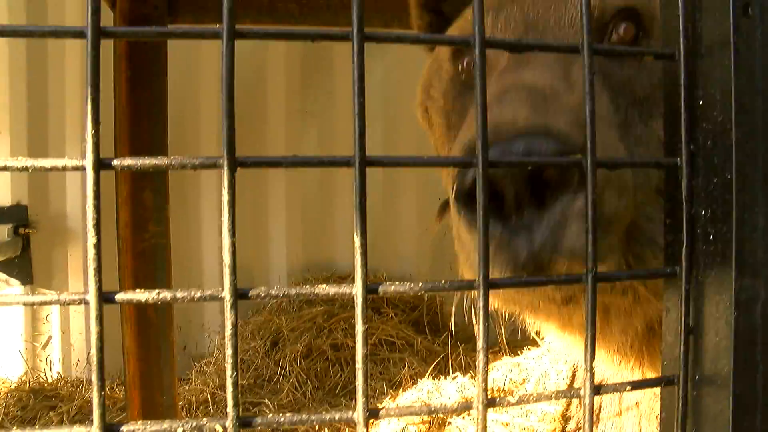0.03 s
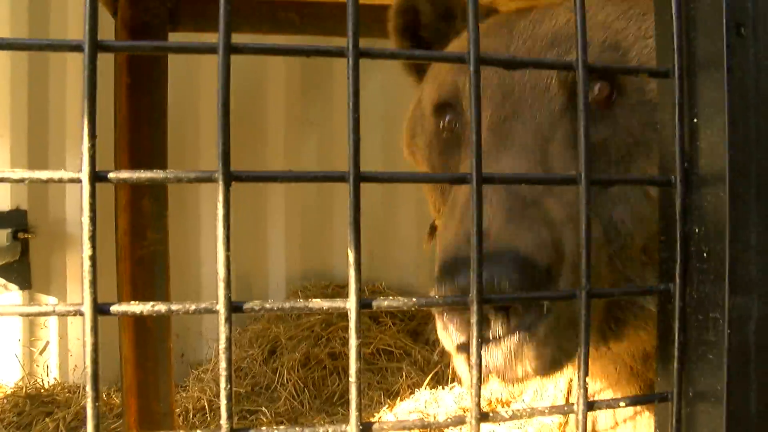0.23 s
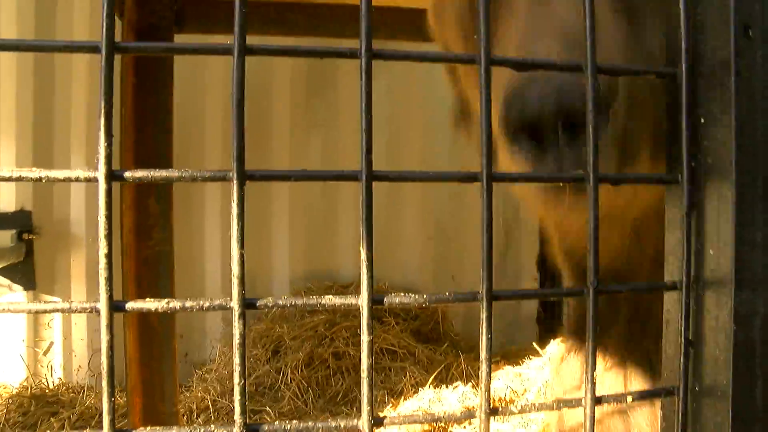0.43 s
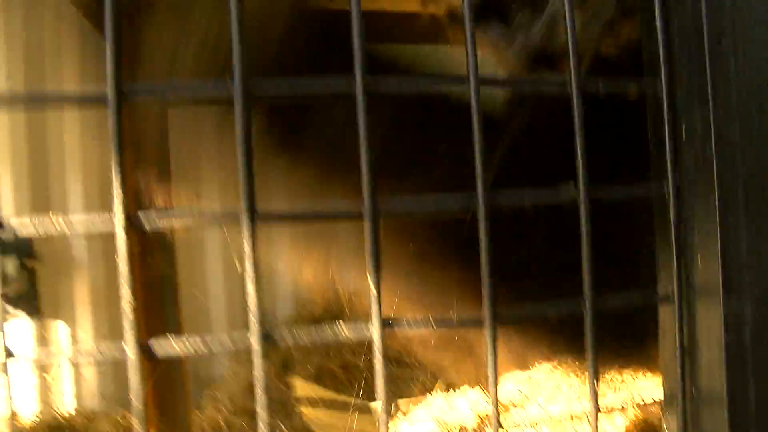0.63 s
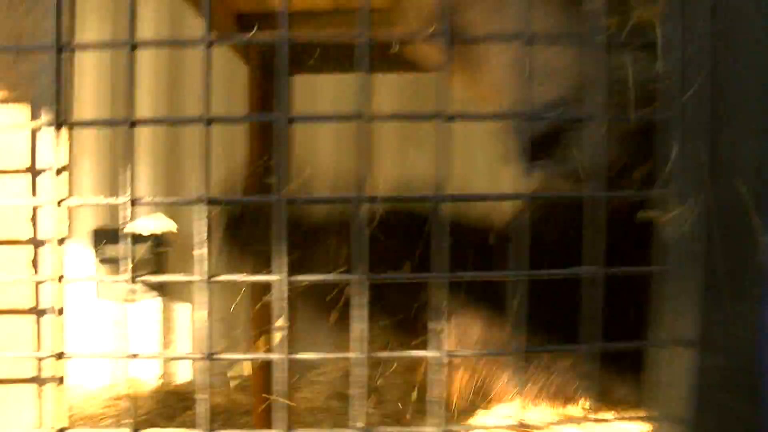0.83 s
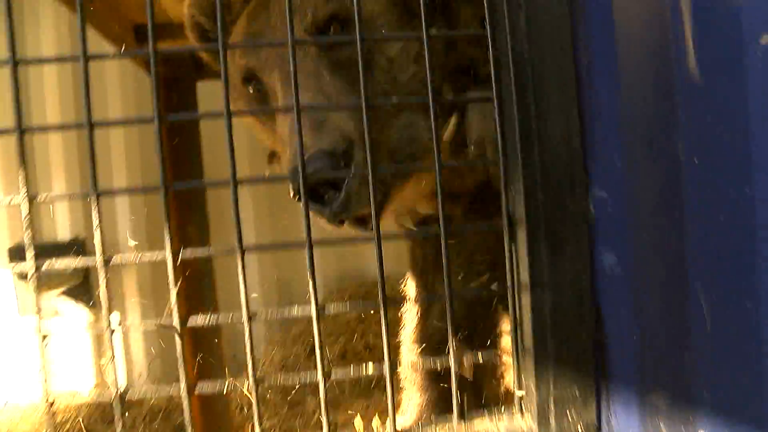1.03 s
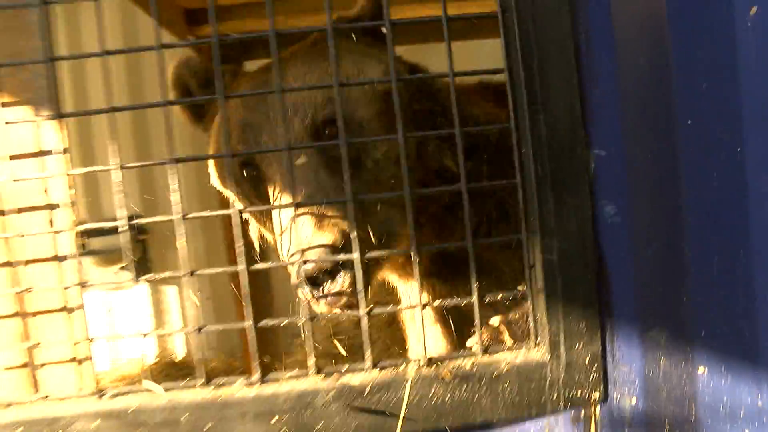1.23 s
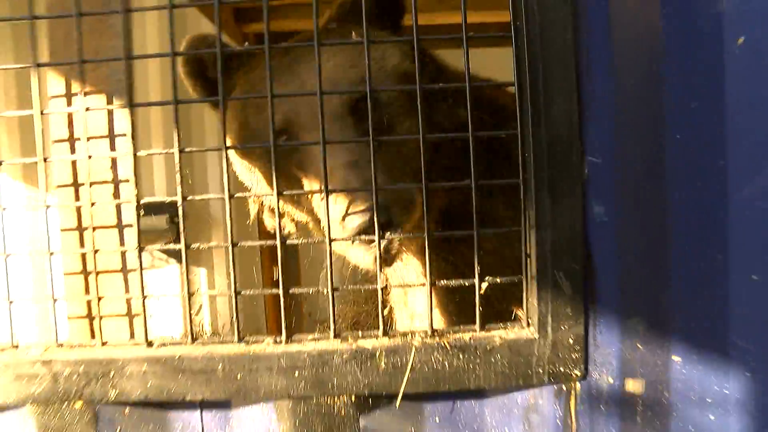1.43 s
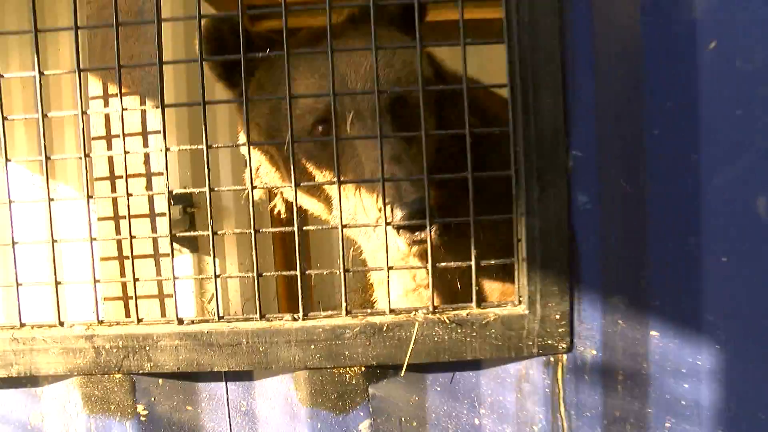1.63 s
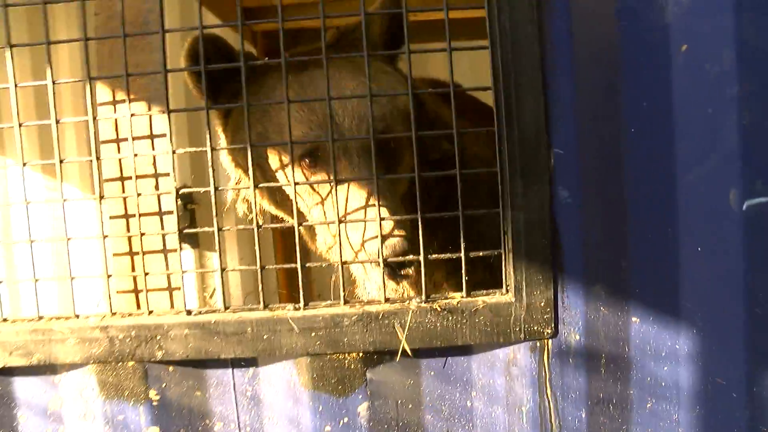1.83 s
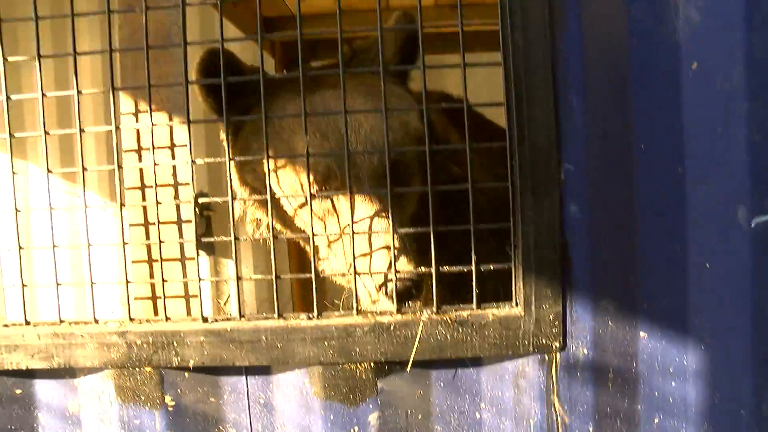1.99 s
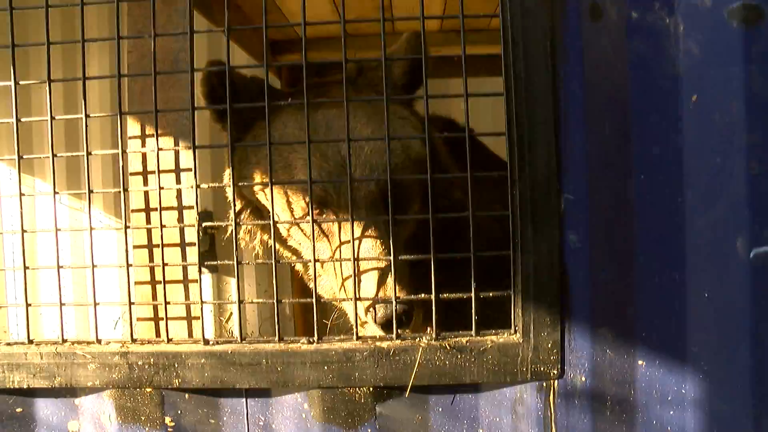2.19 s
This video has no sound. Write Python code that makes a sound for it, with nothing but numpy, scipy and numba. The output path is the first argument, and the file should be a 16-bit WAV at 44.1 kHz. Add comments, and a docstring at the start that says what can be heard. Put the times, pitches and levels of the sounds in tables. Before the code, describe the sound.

A bear huffs close by in a steel cage. A hiss starts at about 0.1 seconds and opens into two loud, hoarse, roaring surges from 0.4 to 0.8. Air rumbles as it lunges, with a hollow floor thump at 1.0, then lighter knocks, rattling wire mesh and faint crackling straw until 1.6. A weaker, breathy huff follows from 1.7 and fades by 2.3 seconds.

```python
"""Bear huffing in a steel cage.

A long double huff: a hiss opens into a roaring blast over a fluttering throat. The bear lunges:
air rumbles, the hollow floor knocks, the mesh rattles, straw crackles. A weaker huff follows.
Heard from just outside the bars, through a limiter."""
import sys
import numpy as np
from scipy import signal
from scipy.fft import rfft, irfft
from scipy.io import wavfile
from scipy.ndimage import uniform_filter1d, minimum_filter1d
from numba import njit

SR = 44100
rng = np.random.default_rng(int(sys.argv[2]) if len(sys.argv) > 2 else 0)


def wav_record(signal):
    """Record a signal, one row per channel, as 16-bit PCM in the file named by sys.argv[1]."""
    frames = np.transpose(np.atleast_2d(signal))
    bounded = np.clip(frames, -1, 1)
    # unit amplitude maps onto the largest positive 16-bit level
    quanta = np.round(bounded * 32767).astype(np.int16)
    wavfile.write(sys.argv[1], SR, quanta)


N = 103635

# hollow floor modes: freq_hz, gain_db, t60_s
FLOOR_MODES = [(210, -9, 0.11), (243.2, 7.5, 0.09), (290, 2, 0.06), (318, -10.5, 0.063), (346, -9, 0.117)]
# spectrum of straw and wire cracks: freq_hz, gain_db
CRACKLE_SPECTRUM = [(300, -32), (1000, 2.5), (2500, -7), (3500, -6), (6300, -16.5), (8000, -17.5),
                    (15000, -29)]


def undb(db):
    """Decibels to gain."""
    return 10 ** (np.asarray(db) / 20)


def unit(x):
    """Scale to rms 1."""
    return x / np.sqrt(np.mean(x ** 2))


def noise():
    """White noise."""
    return rng.standard_normal(N)


def waver(rate_hz):
    """Smooth random drift, rms 1."""
    span = int(SR / rate_hz)
    return unit(uniform_filter1d(uniform_filter1d(noise(), span), span))


def curve(rows, column=1):
    """Table column, interpolated in time."""
    rows = np.array(rows)
    return np.interp(np.arange(N) / SR, rows[:, 0], rows[:, column])


def swell(rows, column=1):
    """Gain from a dB column, fading beyond its ends."""
    t = np.arange(N) / SR
    outside_s = np.maximum(rows[0][0] - t, 0) + np.maximum(t - rows[-1][0], 0)
    return undb(curve(rows, column)) * np.exp(-outside_s / .018)


def colour(x, spectrum):
    """Shape by (freq_hz, gain_db) points, steep cut below the first; rms 1."""
    hz, db = np.array(spectrum).T
    bins_hz = np.maximum(np.arange(N + 1) * SR / (2 * N), 1)
    gain = undb(np.interp(np.log(bins_hz), np.log(hz), db))
    low_cut = np.minimum(bins_hz / hz[0], 1) ** 3
    return unit(irfft(rfft(x, 2 * N) * gain * low_cut)[:N])


@njit
def svf(x, hz, width_hz):
    """State-variable filter: band-pass and low-pass outputs."""
    y = np.empty((2, len(x)))
    band_state, low_state = 0., 0.
    for i in range(len(x)):
        g, damping = np.tan(np.pi * hz[i] / SR), width_hz[i] / hz[i]
        band = (band_state + g * (x[i] - low_state)) / (1 + g * (g + damping))
        y[0, i], y[1, i] = damping * band, low_state + g * band
        band_state = 2 * band - band_state
        low_state += 2 * g * band
    return y


def resonate(x, hz, width_hz):
    """Band-pass with a constant or moving centre."""
    return svf(x, hz * np.ones(N), width_hz * np.ones(N))[0]


@njit
def follow(x, keep):
    """Peak follower."""
    y, peak = np.empty(len(x)), 0.
    for i in range(len(x)):
        peak = max(abs(x[i]), peak * keep)
        y[i] = peak
    return y


def steady(x, span_s=.0425):
    """Even out slow level swings."""
    return x / np.sqrt(uniform_filter1d(x ** 2, int(span_s * SR)) + 1e-12)


def strikes(rows):
    """Impulses from (start_s, level_db) rows."""
    out = np.zeros(N)
    for start_s, db in rows:
        out[int(start_s * SR)] += undb(db)
    return out


def grains(rate_hz, spread_db):
    """Random tiny impacts of uneven size."""
    hits = (rng.random(N) < rate_hz / SR) * np.sign(noise())
    return hits * undb(spread_db * np.clip(noise(), -2, 2))


def ring(modes, scatter_db=0):
    """Struck body, peak 1; scatter randomises the mode weights."""
    t = np.arange(SR // 3) / SR
    out = np.zeros(len(t))
    for hz, db, t60_s in modes:
        weight = undb(db + scatter_db * rng.standard_normal())
        out += weight * np.sin(2 * np.pi * hz * t) * np.exp(-np.log(1000) * t / t60_s)
    return out / np.abs(out).max()


def play(x, response):
    """Convolve with a response."""
    return signal.fftconvolve(x, response)[:N]


def burst(start_s, db, sound, decay_s):
    """Sudden onset, exponential decay."""
    t = np.arange(SR // 20) / SR
    return play(strikes([(start_s, db)]), unit(sound)[:len(t)] * np.exp(-t / decay_s) / 2)


def outdoor_air():
    """Faint steady background."""
    # ambient noise: freq_hz, gain_db
    spectrum = [(25, 3.5), (70, -9.5), (150, -2.5), (270, -27), (350, -8.5), (700, -19.5), (1100, -26),
                (2000, -27), (15000, -44.5)]
    return undb(-55.5) * colour(noise(), spectrum)


def walls(x, wet_db=-13, decay_s=.0059):
    """Quick reflections from close steel walls."""
    t = np.arange(SR // 6) / SR
    echoes = grains(rate_hz=630, spread_db=3.5)[:len(t)] * np.exp(-t / decay_s) * (t > .002)
    wet = play(x, echoes / np.linalg.norm(echoes))
    return (x + undb(wet_db) * wet) / np.hypot(1, undb(wet_db))


def snaps():
    """Dry stalks break with short bright ticks."""
    # breaking straws: start_s, level_db, pitch_hz
    breaks = [(.045, -49.5, 5000), (.95, -46, 10000), (.993, -35, 10000), (1.079, -38, 6500),
              (1.1283, -36, 6100), (1.44, -51, 12500), (1.556, -42, 9200)]
    return sum(burst(start_s, db, resonate(noise(), hz, width_hz=3500), decay_s=.0017)
               for start_s, db, hz in breaks)


def mesh_ring():
    """One spot on the mesh, with its own tuning and mode mix."""
    # mesh modes: freq_hz, gain_db, t60_s
    modes = [(590, 2.5, 0.11), (758, -8.5, 0.14), (1090, 0, 0.13), (1562, -6.5, .07), (2010, -0.5, 0.022),
             (2170, -6, 0.043), (3410, -5, 0.02), (4070, -8, 0.029), (4990, -4.5, .025), (6200, -5, .03)]
    detuned = [(hz * np.exp(.04 * rng.standard_normal()), db, t60_s) for hz, db, t60_s in modes]
    return ring(detuned, scatter_db=5)


def jingle(spots):
    """Small taps at several spots on the mesh."""
    return unit(sum(play(grains(rate_hz=800 / spots, spread_db=4), mesh_ring()) for _ in range(spots)))


def clacks():
    """The mesh slaps its frame and bounces once."""
    # slaps: start_s, level_db
    slaps = [(1.3922, -24), (1.3965, -28)]
    # slap noise: freq_hz, gain_db
    spectrum = [(450, 0), (1900, 2), (2600, -20), (6400, -18), (12000, -38)]
    return sum(burst(start_s, db, colour(noise(), spectrum), decay_s=.004) for start_s, db in slaps)


def rattle(start_s, db, pitch_hz, crack_s=.0025):
    """A loose wire cracks against its neighbour, rings, shakes the mesh and bounces."""
    # wire partials: freq_ratio, gain_db, t60_s
    partials = [(1, 0, .045), (1.77, -6, .035), (3.25, -16, .02)]
    t = np.arange(SR // 3) / SR
    wire = ring([(pitch_hz * ratio, gain_db, t60_s) for ratio, gain_db, t60_s in partials], scatter_db=1)
    crack = colour(noise(), CRACKLE_SPECTRUM)[:len(t)] * np.exp(-t / crack_s)
    bounce_s = rng.uniform(.003, .014)
    hits = strikes([(start_s, db), (start_s + bounce_s, db - 6)])
    return play(hits, wire + undb(-8) * mesh_ring() + undb(-10) * crack)


def knock(start_s, peak_db):
    """A padded paw drives one low band of the floor: a boom, no click."""
    floor = play(strikes([(start_s, 0)]), ring(FLOOR_MODES, scatter_db=.5))
    boom = resonate(floor, hz=273, width_hz=270)
    return undb(peak_db) * boom / np.abs(boom).max()


def cage():
    """Paws knock the floor, shake the mesh and stir the straw. Returns highs, lows."""
    # paw falls: start_s, peak_db
    paw_falls = [(0.762, -24), (0.989, -9), (1.051, -23), (1.084, -31), (1.127, -23), (1.299, -22),
                 (1.36, -19.5), (1.393, -20), (1.436, -22), (1.46, -26), (1.506, -30), (1.559, -30)]
    # wire hits: start_s, level_db, pitch_hz
    wire_hits = [(.9913, -33, 1950), (1.0232, -38, 2380), (1.0422, -35, 2190), (1.0765, -28, 1920),
                 (1.077, -29, 610), (1.098, -32, 700), (1.102, -39, 1870), (1.1265, -33, 1900),
                 (1.149, -41, 3400), (1.172, -37, 1950), (1.2387, -35, 1290), (1.2758, -33, 1100),
                 (1.2976, -33, 1530), (1.299, -41, 4300), (1.322, -42, 2720), (1.344, -32, 1090),
                 (1.402, -36, 2010), (1.4378, -38, 1130), (1.4597, -39, 2110), (1.5068, -38, 600),
                 (1.6159, -47, 3570)]
    # scuffling in the bedding: time_s, gain_db
    scuffle = [(.8, -11), (.95, -1), (1.1, -1), (1.25, 1), (1.38, -1), (1.48, -6.5), (1.59, -6),
               (1.635, -20)]
    knocks = sum(knock(*row) for row in paw_falls)
    rattles = sum(rattle(*row) for row in wire_hits)
    flicker = np.exp(.45 * waver(rate_hz=200))
    straw = undb(-50.5) * colour(noise() * flicker, CRACKLE_SPECTRUM)
    treads = grains(rate_hz=200, spread_db=2)
    mesh = undb(-48) * jingle(spots=8)
    floor = undb(-35) * steady(play(treads, ring(FLOOR_MODES)), span_s=.12)
    motion = swell(scuffle)
    return rattles + clacks() + snaps() + (straw + mesh) * motion, knocks + floor * motion


def rush():
    """Buffeting air after the blast dulls as it slows."""
    # gust: time_s, level_db, cutoff_hz
    gust = [(.62, -64, 1501), (.71, -29, 1420), (.79, -31, 1070), (.85, -27.5, 694), (.92, -30.5, 585),
            (1., -35, 466), (1.3, -41, 413), (1.55, -51, 397)]
    cutoff_hz = curve(gust, 2)
    puffs = unit(grains(rate_hz=1200, spread_db=2))
    eddies = colour(puffs + noise(), [(170, 1.5), (1500, -6.5), (6000, -24), (15000, -24)])
    _, dulled = svf(eddies, cutoff_hz, 1.76 * cutoff_hz)
    return steady(dulled) * swell(gust)


def rumble():
    """Low air rumble of the lunge."""
    # rumble envelope: time_s, level_db
    envelope = [(.55, -39), (.79, -36.5), (.85, -28), (.96, -28), (1.03, -31), (1.12, -29), (1.17, -34.5),
                (1.32, -32.5), (1.45, -39), (1.65, -39.5), (2.35, -49)]
    # rumble noise: freq_hz, gain_db
    spectrum = [(18, -40), (27, 10), (45, -5.5), (65, 6.5), (90, 3), (125, -3), (165, -4), (260, -16),
                (600, -85)]
    return steady(colour(noise(), spectrum), span_s=.041) * swell(envelope)


def chest():
    """Deep noise under each huff."""
    # chest noise: freq_hz, gain_db
    spectrum = [(15, -64), (30, -4.5), (60, 1), (120, -2), (180, -1.5), (400, -48)]
    return steady(colour(noise(), spectrum))


def flutter(rate_hz=76.52, jitter=.35, spread_db=2.1, flap_s=.0093, depth=.16):
    """Irregular throat flaps: their pulses and the gain they put on the airflow."""
    gap_draw, size_draw = rng.standard_normal((600, 2)).T
    onsets = (np.cumsum(np.exp(jitter * gap_draw)) * SR / rate_hz).astype(int)
    pulses = np.zeros(N)
    pulses[onsets[onsets < N]] = undb(spread_db * size_draw[onsets < N])
    flaps = play(pulses, np.hanning(int(flap_s * SR)))
    return unit(pulses), np.exp(depth * unit(flaps - flaps.mean()))


def throat(pulses, hz, width_hz, turbulence):
    """Flaps and turbulence drive the low throat resonance."""
    drive = pulses + turbulence * noise()
    return steady(resonate(resonate(drive, hz, width_hz), hz, width_hz))


def growl(centre_hz, wobble=.075, shimmer=.4):
    """Hoarse tone, unsteady in pitch and level."""
    pitch_hz = centre_hz * np.exp(wobble * waver(rate_hz=103))
    tone = np.sin(2 * np.pi * np.cumsum(pitch_hz) / SR)
    return unit(tone * np.exp(shimmer * waver(rate_hz=67)))


def breath(airflow, spectrum):
    """Turbulent air through moving mouth and nostril resonances."""
    # lowest mouth resonance: time_s, centre_hz
    mouth_track = [(.15, 700), (.43, 775), (.6, 1080), (1.9, 1100), (2.05, 800)]
    # nostril resonance: time_s, centre_hz, gain_db
    nose_track = [(.15, 5030, -38), (.3, 6300, 8.5), (.42, 8500, -6), (.7, 7940, -13), (1.68, 4300, 5),
                  (1.77, 5500, 0), (1.835, 7160, 3), (1.88, 4100, -3), (1.93, 4350, 5), (2.05, 5730, -5.5),
                  (2.3, 5060, -32)]
    air = colour(noise() * airflow, spectrum)
    mouth = undb(-6.5) * resonate(air, curve(mouth_track), width_hz=170)
    nose = undb(curve(nose_track, 2)) * resonate(air, curve(nose_track), width_hz=750)
    return unit(air + mouth + nose)


def weak_huff():
    """Softer air, shaped by the lips, over throat and chest. Returns highs, lows."""
    # huff envelopes: time_s, air_db, throat_db
    envelopes = [(1.655, -96, -44), (1.672, -54.5, -44), (1.7, -44, -41.5), (1.765, -37, -32.5),
                 (1.85, -37.5, -41), (1.95, -40.5, -40), (2.09, -40.5, -38), (2.18, -42, -50.5),
                 (2.235, -49.5, -48), (2.35, -57.5, -57.5)]
    # air stream: freq_hz, gain_db
    spectrum = [(250, -33), (420, -2), (620, -4), (790, 0), (921, -3), (1490, -3), (2140, -4), (3320, -7),
                (4430, -8), (15000, -31)]
    # lip resonance: time_s, centre_hz, gain_db
    lip_track = [(1.72, 1800, -7), (1.81, 2140, 3.5), (1.9, 2350, 2.5), (2.1, 2150, -15)]
    pulses, airflow = flutter()
    lows = throat(pulses, hz=257, width_hz=99, turbulence=1.53) + undb(-7) * chest()
    air = breath(airflow, spectrum)
    lips = undb(curve(lip_track, 2)) * resonate(air, curve(lip_track), width_hz=300)
    return unit(air + lips) * swell(envelopes), lows * swell(envelopes, 2)


def double_huff(treble_hz=4500):
    """A hiss opens into two surges of air over throat, chest and growl. Returns highs, lows."""
    # narrow-mouthed hiss: time_s, level_db
    hiss_track = [(.105, -87), (.13, -54), (.15, -46), (.2, -40), (.22, -33.5), (.3, -32), (.37, -38.5),
                  (.45, -33), (.55, -65)]
    # hiss noise: freq_hz, gain_db
    hiss_spectrum = [(250, -47), (420, -4.5), (850, 0), (1900, -7), (2530, -4), (3530, -15.5), (4490, -8.5),
                     (6460, -15), (15500, -31.5)]
    # open-mouthed blast: time_s, level_db, treble_db
    blast_track = [(.3, -45.5, -3), (.36, -31, 1.5), (.43, -25, -2), (.465, -26.5, -3), (.5, -29.5, 2),
                   (.54, -30.5, -4), (.585, -25, 1), (.665, -25, 4), (.705, -23, 2), (.717, -35, 5),
                   (.73, -30.5, 5.5), (.757, -36.5, -6), (.768, -31, 2.5), (.8, -39.5, -5),
                   (.83, -44.5, -13)]
    # blast noise: freq_hz, gain_db
    blast_spectrum = [(240, -22), (400, -20), (633, -6), (772, -2), (2060, -1.5), (3680, -8), (4350, -8),
                      (8930, -16), (15500, -28.5)]
    # throat flutter: time_s, level_db, resonance_hz
    throat_track = [(.12, -59, 189), (.21, -37, 165), (.32, -34.5, 196), (.345, -31.5, 196),
                    (.425, -27, 191), (.46, -29.5, 150), (.51, -31, 227), (.548, -34, 242),
                    (.595, -23.5, 232), (.62, -23.5, 180), (.638, -33, 225), (.67, -22.5, 256),
                    (.707, -23.5, 330), (.735, -30, 288), (.765, -26, 245), (.81, -45, 246)]
    pulses, airflow = flutter()
    hiss = breath(airflow, hiss_spectrum) * swell(hiss_track)
    air = breath(airflow, blast_spectrum)
    body = signal.sosfiltfilt(signal.butter(1, treble_hz, fs=SR, output="sos"), air)
    treble = (air - body) * undb(curve(blast_track, 2))
    blast = (body + treble) * swell(blast_track)
    throat_hz = curve(throat_track, 2)
    lows = throat(pulses, throat_hz, width_hz=208, turbulence=1) + chest() + growl(throat_hz)
    return hiss + blast, unit(lows) * swell(throat_track)


def scene():
    """Bear and cage over outdoor air; only the highs reflect off the walls."""
    highs, lows = np.sum([double_huff(), weak_huff(), cage()], axis=0)
    return (walls(highs) + lows + rush() + rumble() + outdoor_air())[None]


def record(dry):
    """Fast peak limiter, then a steep low-pass."""
    limit_db, release_s, cutoff_hz = -15.5, .019, 15500
    peak = follow(dry[0], np.exp(-1 / (release_s * SR)))
    gain = np.minimum(1, undb(limit_db) / (peak + 1e-9))
    smooth_gain = uniform_filter1d(minimum_filter1d(gain, size=45), size=45)
    return signal.sosfilt(signal.ellip(10, .2, 80, cutoff_hz, fs=SR, output="sos"), dry * smooth_gain)


dry = scene()
out = record(dry)
wav_record(out)
```